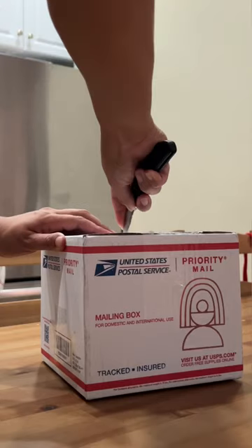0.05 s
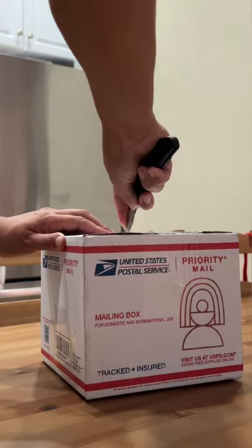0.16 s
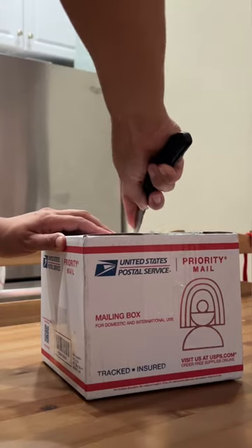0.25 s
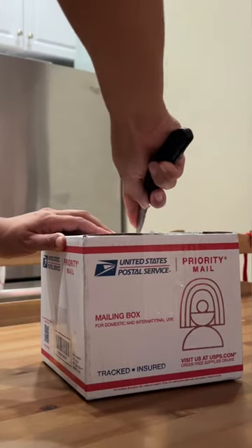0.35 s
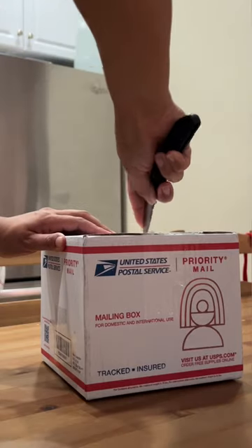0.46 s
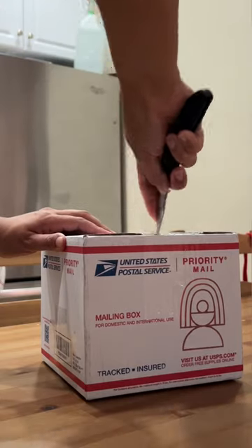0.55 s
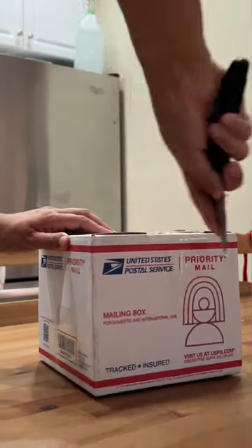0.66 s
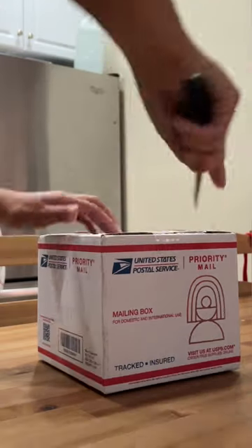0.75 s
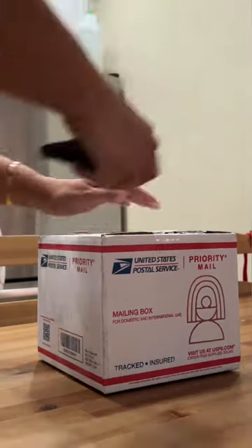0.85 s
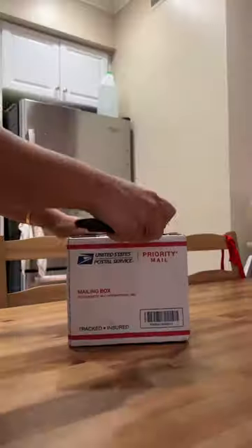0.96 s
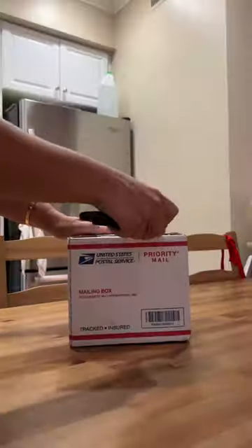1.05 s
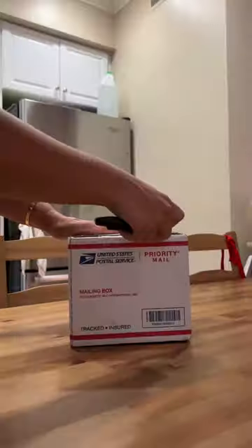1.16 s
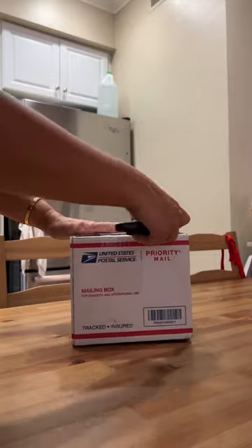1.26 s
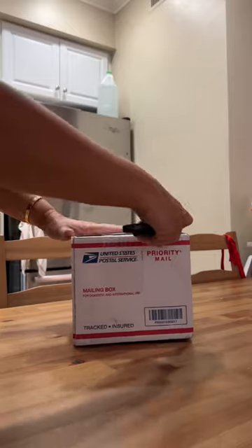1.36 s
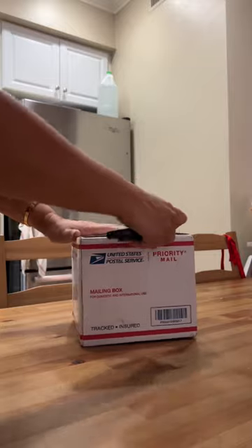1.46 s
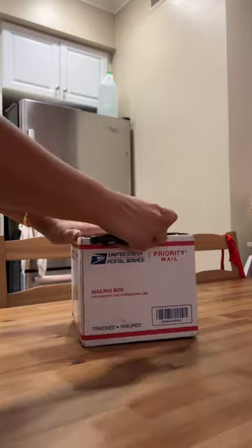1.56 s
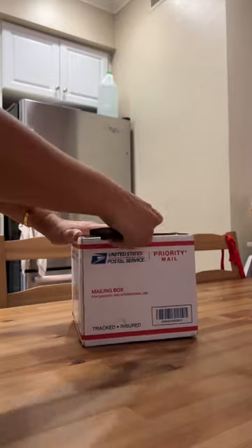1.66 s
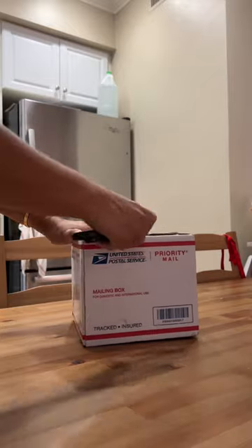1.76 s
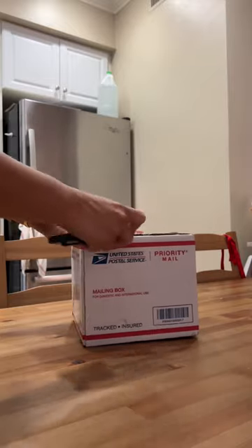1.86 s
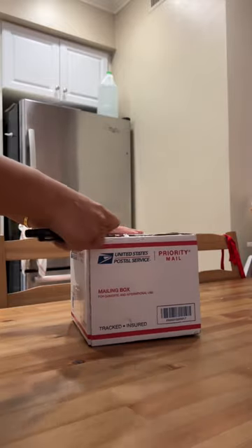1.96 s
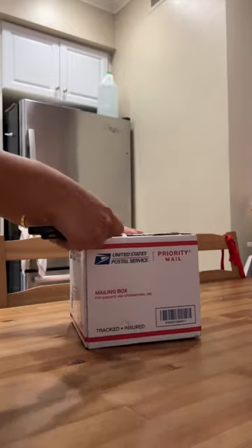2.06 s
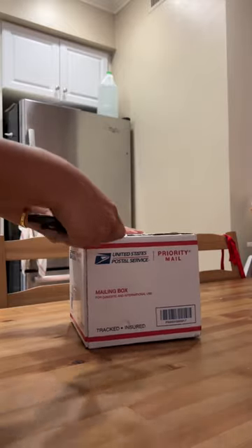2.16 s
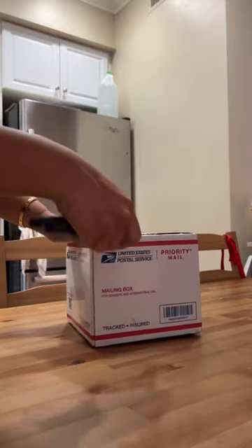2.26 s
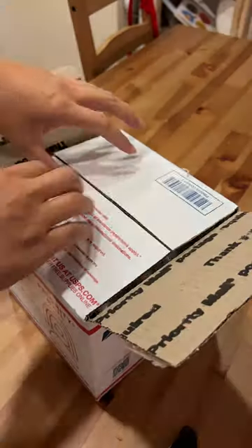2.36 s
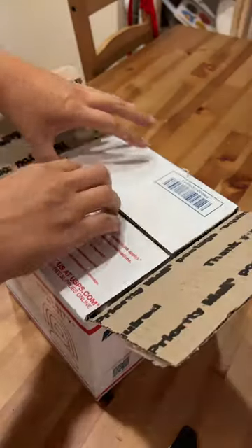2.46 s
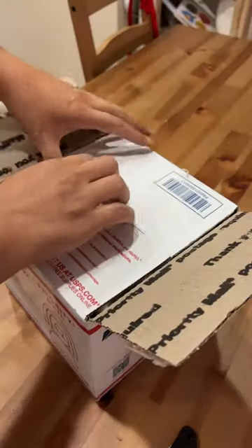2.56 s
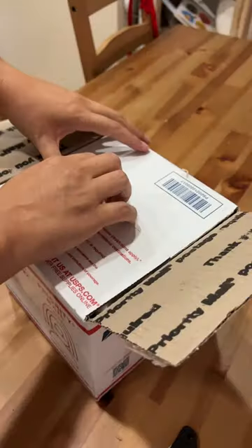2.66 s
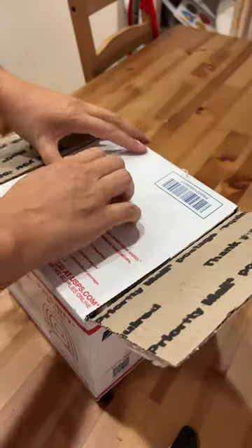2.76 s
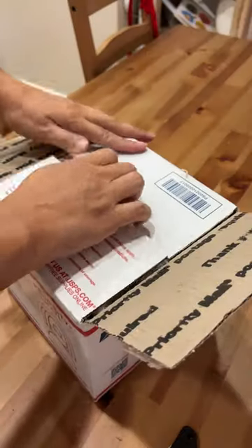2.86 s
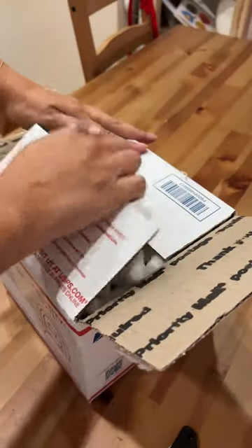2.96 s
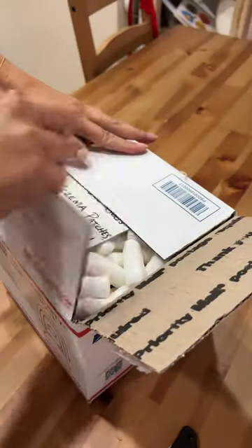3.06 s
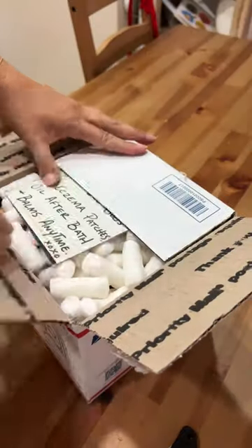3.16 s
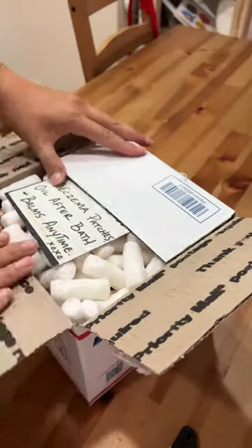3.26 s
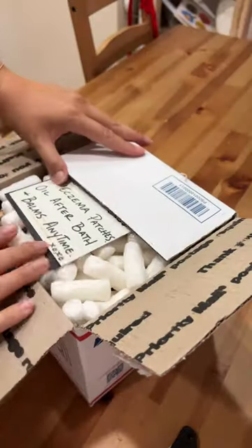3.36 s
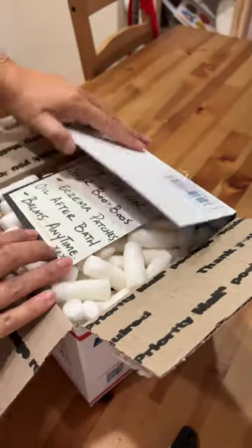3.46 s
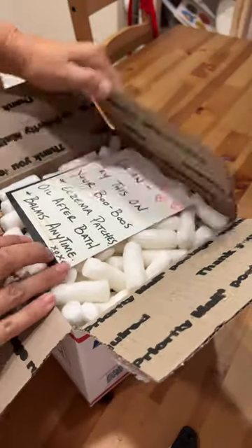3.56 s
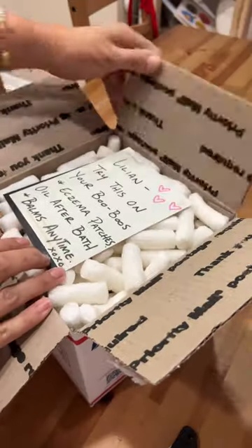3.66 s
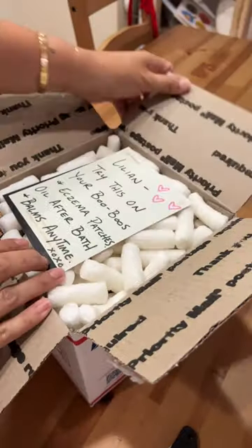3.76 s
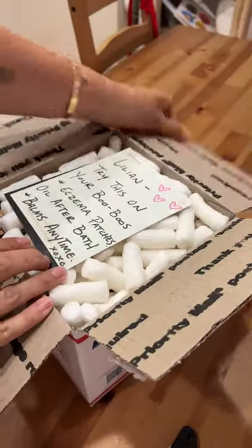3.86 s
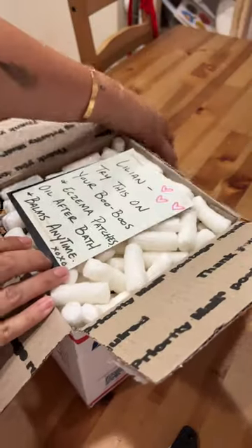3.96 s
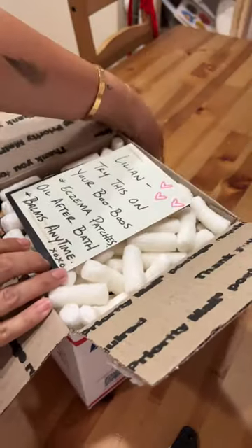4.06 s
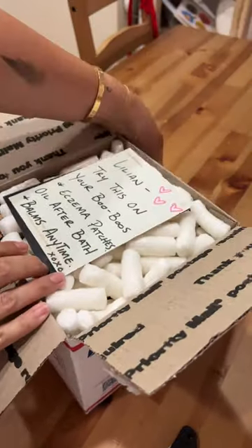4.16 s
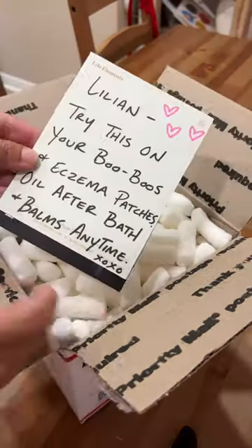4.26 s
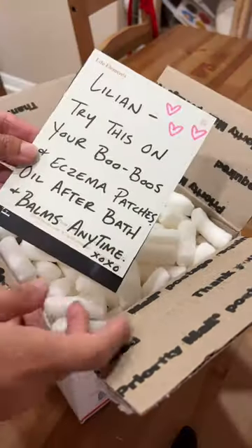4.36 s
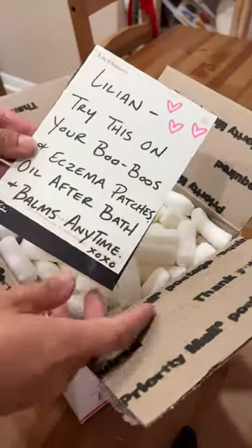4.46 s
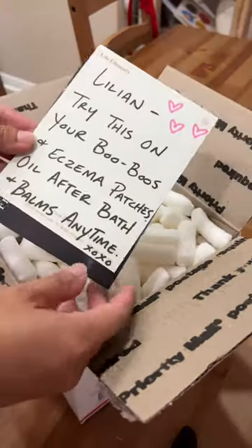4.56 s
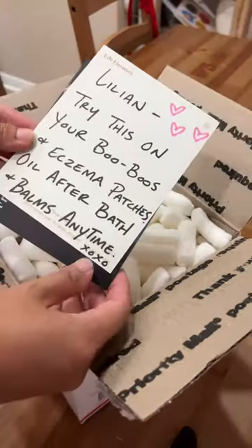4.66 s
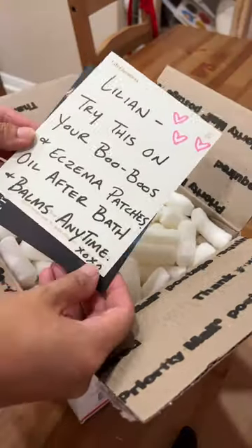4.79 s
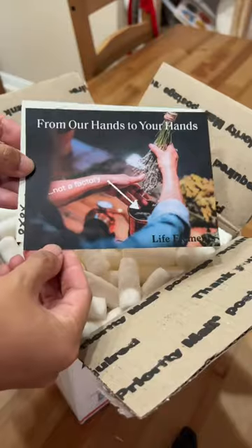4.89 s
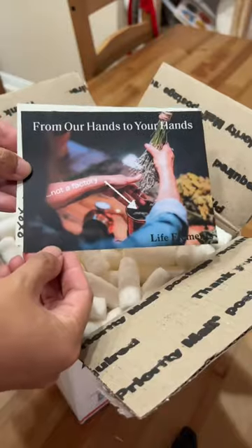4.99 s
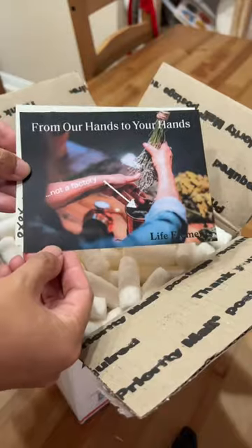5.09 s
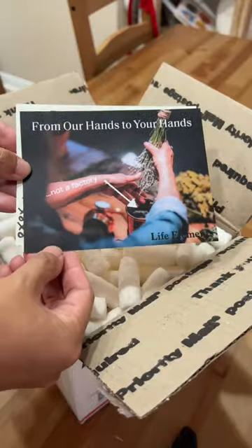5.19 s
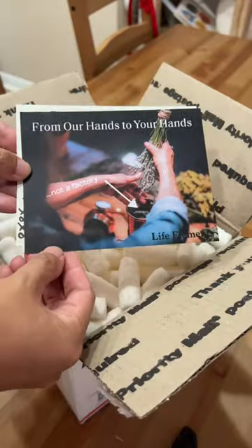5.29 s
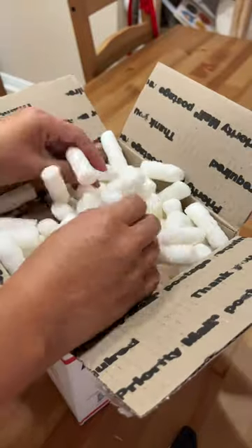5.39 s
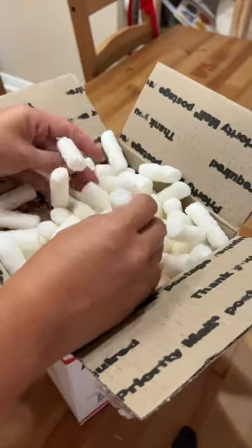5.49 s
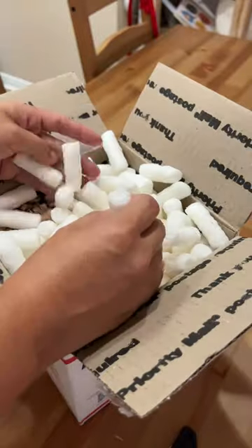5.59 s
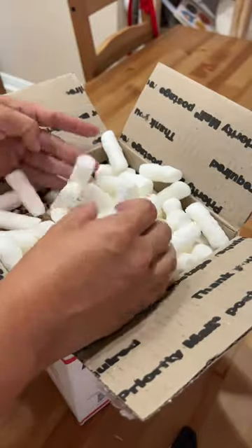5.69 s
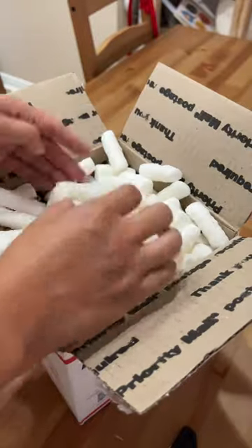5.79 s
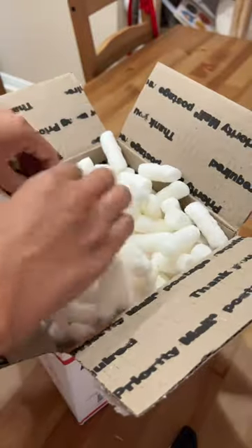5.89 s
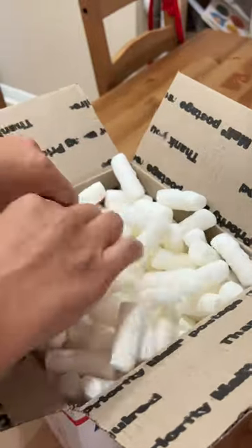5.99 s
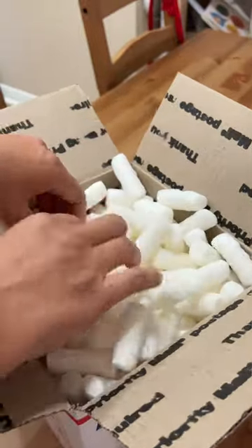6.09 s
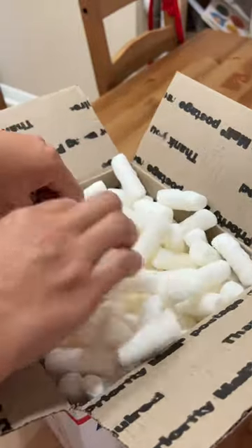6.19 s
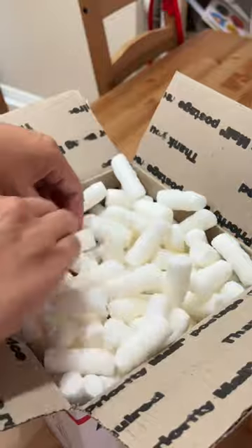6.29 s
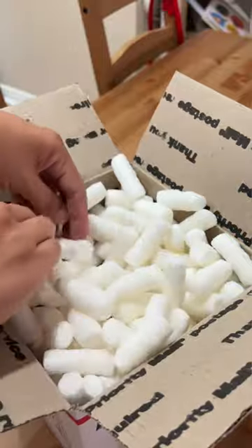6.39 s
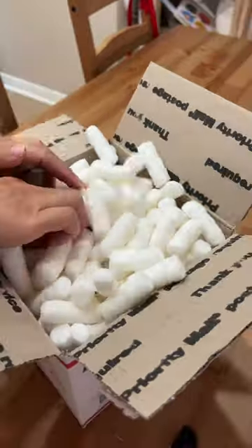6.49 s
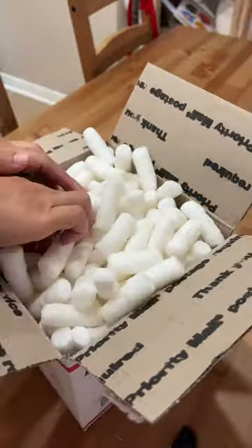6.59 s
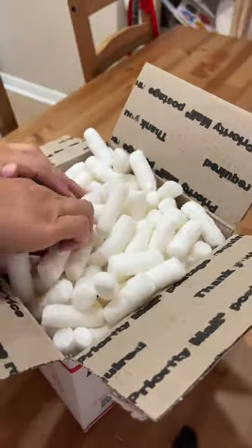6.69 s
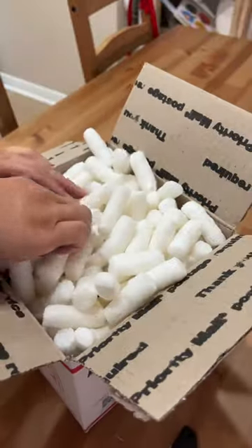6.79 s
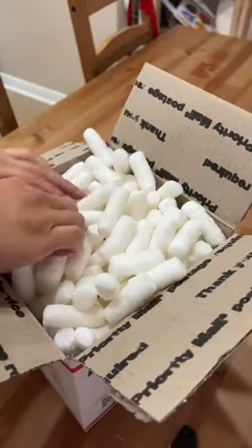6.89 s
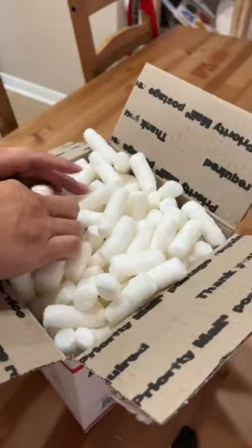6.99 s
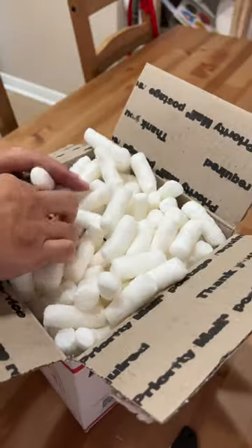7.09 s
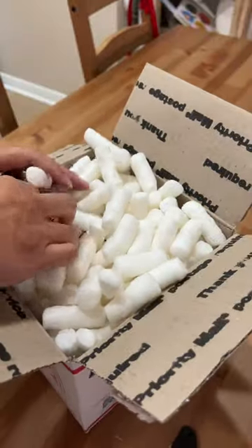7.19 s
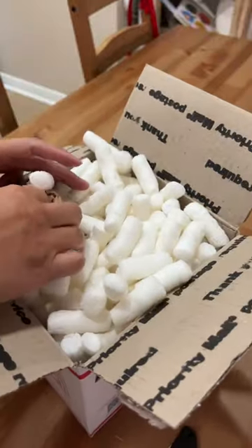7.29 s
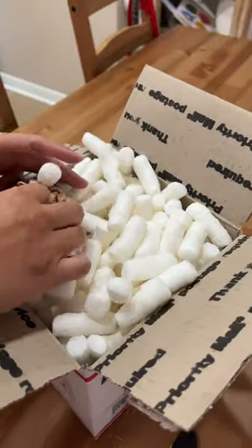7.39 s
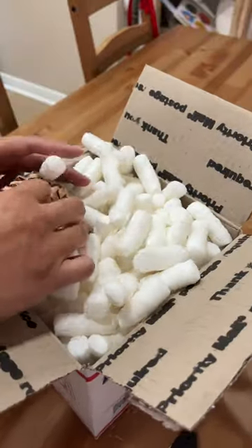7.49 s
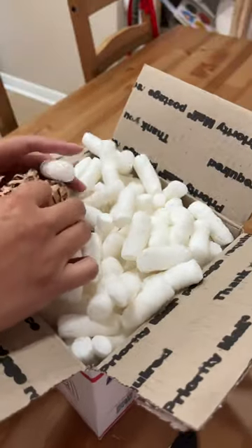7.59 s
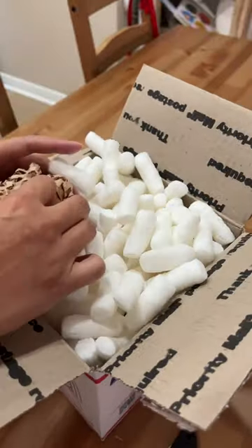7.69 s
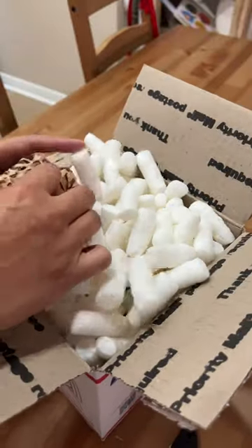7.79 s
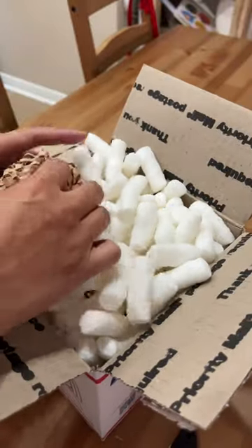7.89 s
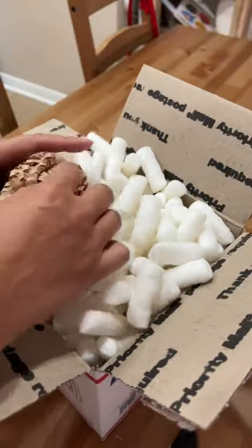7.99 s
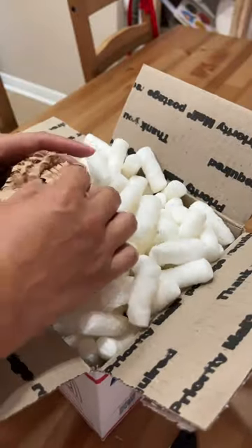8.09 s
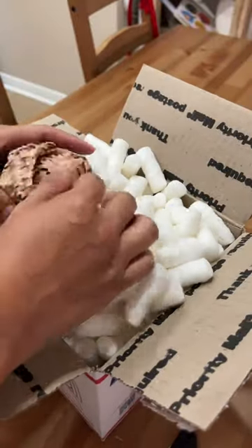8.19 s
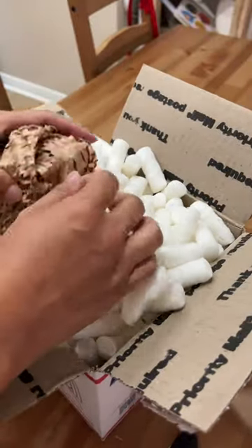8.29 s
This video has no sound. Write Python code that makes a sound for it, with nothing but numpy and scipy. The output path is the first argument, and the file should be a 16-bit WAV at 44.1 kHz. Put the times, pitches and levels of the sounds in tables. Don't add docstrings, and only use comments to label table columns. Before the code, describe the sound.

Hands slit a taped cardboard box with hollow scrapes and a sharp tape snap, fold the flaps, then dig noisily through foam packing peanuts.

```python
import sys
import numpy as np
from scipy import signal
from scipy.fft import rfft, irfft, next_fast_len
from scipy.io import wavfile
from scipy.ndimage import uniform_filter1d

SR = 44100
rng = np.random.default_rng(int(sys.argv[2]) if len(sys.argv) > 2 else 0)


def invert_db(level):
    return 10 ** (np.asarray(level, dtype=float) / 20)


def master_out(mix):
    frames = np.transpose(np.atleast_2d(mix))
    ceiling = np.clip(frames, -1, 1)
    pcm = np.round(ceiling * 32767).astype(np.int16)
    wavfile.write(sys.argv[1], SR, pcm)


N = 367794

# frequency_hz, density_db
FOAM_COLOUR = [(240, -26.5), (400, 7), (512, -9), (636, -2), (730, -13), (852, -7.5), (1010, -13.5),
               (2150, -4.5), (3160, -10), (6340, -14), (9920, -21.5), (11000, -18), (16000, -31)]
# frequency_hz, density_db
TAPE_COLOUR = [(240, -37), (400, -1), (645, -19.5), (719, -6.5), (865, -17.5), (1200, -13), (2050, -10.5),
               (3640, -18.5), (7990, -22), (9920, -25.5), (11200, -23), (16000, -42.5)]
# frequency_hz, density_db
ROOM_COLOUR = [(15, -62.5), (25, -31), (44, -5), (65, -3.5), (82, -17), (102, -3), (122, -0.5),
               (147, -12.5), (213, -12.5), (326, -21), (916, -41.5), (3000, -56.5), (8000, -56.5),
               (12500, -59), (14500, -71)]
# frequency_hz, width_hz, level_db
BOX_MODES = [(65, 14, -6.5), (111, 56, -2.5), (180, 127, 5.5), (213, 7, 11), (247, 2.9, -10),
             (311, 3, -7.5), (392, 22, -3), (407, 17, -15.5)]
# frequency_hz, width_hz, level_db
SHUT_MODES = [(381, 48, 6), (310, 30, 4), (415, 34, 1), (560, 45, -6.5)]
# frequency_hz, width_hz, level_db
CARD_MODES = [(850, 370, 5), (2610, 300, -5), (3930, 640, -6)]
# frequency_hz, width_hz, level_db
BLADE_MODES = [(1150, 600, 1), (2240, 190, 2)]
# frequency_hz, width_hz, level_db
SNAP_MODES = [(1290, 560, -10.5), (2300, 540, -10), (3130, 260, 1), (4470, 780, 11.5), (7550, 820, -9),
              (10100, 2400, -14.5)]
# frequency_hz, t60_s
KITCHEN_T60 = [(100, 0.2), (500, 0.15), (3000, 0.24), (12000, 0.51)]
# frequency_hz, side_minus_mid_db
STEREO_WIDTH = [(40, -16), (70, -23), (110, -32), (170, -38), (270, -24.5), (450, -10.5), (740, -5),
                (1220, -21), (2010, -9.5), (4000, -11), (8000, -2), (15000, 0)]
# frequency_hz, left_minus_right_db
STEREO_LEAN = [(180, 0), (260, 2.6), (330, 2.6), (520, 0)]

SHOTS = [
    0,
    .928,
    2.328,
    4.858,
    5.358,
    5.966,
    6.516,
    8.065,
    9,
]
# start_s, end_s
SHUT_SPANS = [
    (0, .93),
    (2.46, 2.66),
    (7.3, 7.85),
]
# peak_s, rub_db, box_over_rub_db, rise_20db_s, fall_20db_s
SLITTING_STROKES = [(0.021, -43, 16, .02, 0.02), (0.04, -52.5, 15.5, -0.1, 0.1), (0.0, -51, 21.5, 3, -0.34),
                    (0.12, -62.5, 11, .6, 1.6), (0.166, -49, 17, -0.06, 0.1), (0.189, -48, 17, -0.21, 0.09),
                    (0.225, -44, 14.5, -0.14, 0.16), (0.254, -48, 17.5, -0.1, 0.14),
                    (0.39, -59.5, 15.5, 1.9, -4), (0.412, -47, 11.5, 0.15, 0.14), (0.5, -40, 8, 0.04, 0.09),
                    (0.549, -40, 13, 0.04, 0.08), (0.455, -38.5, 10, .055, 0.2152),
                    (0.605, -41, 12, 0.17, 0.17), (0.68, -48, 11.5, -0.96, 0.17), (0.96, -63, 10.5, -1, 4),
                    (1.06, -63.5, 3, -2, -22), (1.202, -51.5, 8.5, 0.32, 0.16),
                    (1.26, -62, 10.5, -0.6, 0.6), (1.488, -55.5, 7.5, 0, 0.6), (1.598, -42, 15, .002, .12),
                    (1.638, -42, 10, .04, .24), (1.901, -46, 9.5, 0.21, 0.3),
                    (1.95, -45.5, 10, 0.16, -0.03), (2.16, -55, 6, .3, 0.25)]
# peak_s, rub_db, box_over_rub_db, rise_20db_s, fall_20db_s
FOLDING_STROKES = [(2.364, -69, 5, 0.3, .3), (2.391, -48, -9, 0.0027, 0.099), (2.42, -52.5, 2, 0.022, 0.11),
                   (2.461, -58.5, 21.5, 0.0054, 0.07), (2.489, -59.5, 11.5, .05, .1),
                   (2.515, -57.5, 12.5, 0.13, .2), (2.629, -55.5, 12.5, 0.089, 0.04),
                   (2.574, -50.5, 10.5, 0.14, 0.19), (2.784, -52.5, 11, 0.15, 0.21),
                   (2.912, -37, 2, 0.019, 0.04), (3.036, -54.5, 8, 0.38, 0.02),
                   (3.05, -43, 1.5, 0.0026, 0.039), (3.16, -55.5, 9, 0.63, .1),
                   (3.196, -38.5, -4, 0.057, 0.11), (3.35, -53.5, 11, 0.59, 0.53),
                   (3.583, -49, 7.5, 0.43, 0.2), (3.72, -44, -17, .005, 0.027),
                   (3.76, -59, 9.5, 0.13, 0.58), (3.92, -57.5, 10.5, 0.046, 0.35),
                   (4.09, -64, 16, 0.078, 0.74)]
# peak_s, rub_db, box_over_rub_db, rise_20db_s, fall_20db_s
LIFTING_STROKES = [
    (4.225, -56.5, 14.5, 0.018, 0.17),
    (4.255, -51, 9, 0.12, 0.096),
    (4.29, -54, 4, 0.13, 0.15),
    (4.42, -54, 8, 0.31, 0.35),
    (4.621, -69.5, 12.5, .2, 0.47),
    (4.968, -65.5, 7.5, 0.082, 0.15),
    (5.205, -73.5, 0, 0.045, 0.17),
]
# peak_s, rub_db, box_over_rub_db, rise_20db_s, fall_20db_s
DIGGING_STROKES = [(5.37, -53.5, 6, 0.025, 0.54), (5.44, -52.5, 5.5, .1, 0.23),
                   (5.595, -50.5, -5, 0.35, 0.098), (5.745, -56, 6.5, 0.63, 0.025),
                   (5.8, -60.5, 9, 0.27, 0.45), (5.861, -48.5, 6.5, 0.0087, 0.31), (5.957, -48, 3, .06, .1),
                   (6.01, -49.5, 5, 0.52, 0.68), (6.224, -46, 4.5, 0.077, 0.11),
                   (6.397, -45, -0.5, 0.088, 0.14), (6.49, -40.5, 0.5, 0.091, 0.86),
                   (6.534, -44, 14, 0.019, 0.074), (6.61, -41, -4.5, 0.42, 2.7),
                   (6.8136, -30, -3.5, 0.0036, 0.017), (6.788, -36.5, -11, 0.04, 0.08),
                   (6.87, -46, 4.5, 0.057, 0.38), (6.979, -37.5, -0.5, 0.04, 0.67),
                   (7.13, -35.5, -2.5, 1, 0.14), (7.24, -43.5, 0, .02, 0.34),
                   (7.32, -42.5, -1.5, 0.28, 0.4), (7.431, -39, -3, 0.42, 0.45),
                   (7.5, -41.5, 0, 0.26, 0.087), (7.585, -42.5, -2.5, 0.018, 0.84),
                   (7.66, -40, -2, 0.26, 0.27), (7.87, -42.5, 3.5, 0.17, 0.16), (7.759, -38, 0, 0.4, 0.26),
                   (8.026, -43.5, 4.5, 0.15, 0.061), (8.109, -40.5, -0.5, 0.062, 0.25),
                   (8.178, -43, -9, 0.39, 0.32), (8.33, -51, 10.5, 0.19, .3)]
# fizz_over_crackle_db, board_over_crackle_db
ACTION_BALANCE = [
    (2.5, 2),
    (-1.5, 1),
    (-2.5, -3),
    (-4, -3.5),
]
# time_s, toward_fizz_db
TOUCH_CURVE = [(0, -1), (.6, -4.5), (1.05, -14.5), (1.2, -4.5), (1.95, -4), (2.15, 2), (2.3, -8),
               (2.5, 1.5), (2.7, -3), (2.9, -4), (3.6, 2), (4.12, -5), (4.25, 0.5), (4.31, 10), (4.7, 1),
               (4.95, -16.5), (5.33, -7), (5.37, 7.5), (5.85, 3), (6.6, 0.5), (7.2, -3.5), (7.45, -3),
               (7.55, -5), (7.8, -2), (8.34, 1)]
# start_s, crack_db, thump_over_crack_db, board_over_crack_db, thump_hz
SLITTING_KNOCKS = [(0.0165, -32, 10, 5, 604), (0.036, -35, 9.5, -3, 415), (0.163, -38, 12, 8, 400),
                   (0.166, -39, 15.5, 0.5, 215), (0.188, -39.5, 15, 0, 365),
                   (0.2215, -31.5, 6.5, -1.5, 293), (0.252, -32.5, 10, 3, 398),
                   (0.3653, -32.5, -3, 0.5, 310), (0.4497, -32, -1, -7, 310), (0.5448, -34, -6, 12.5, 204),
                   (0.5746, -30, 6, -8, 128), (0.608, -16, -2.5, -3, 190), (1.1995, -42.5, 12.5, 8.5, 219),
                   (1.2, -46.5, 12, -9, 1230), (1.596, -26, -0.5, 0, 1070), (1.6005, -27, 3.5, -1, 1120),
                   (1.6146, -29.5, 5, -6.5, 213), (1.659, -42, 15, -5, 213), (1.675, -44.5, 16, -4, 213),
                   (1.642, -41.5, 13.5, 2, 213), (1.606, -41.5, 11.5, 7.5, 327),
                   (1.6522, -13, -19, -5.5, 300), (0.6, -36.5, 15, 2.5, 300)]
# start_s, crack_db, thump_over_crack_db, board_over_crack_db, thump_hz
FOLDING_KNOCKS = [(2.3867, -35.5, 0.5, 7.5, 122), (2.4628, -39, 12, -26, 400), (2.468, -37.5, 5, -1, 108),
                  (2.476, -47, 10, 2, 420), (2.484, -51.5, 12, -2, 200), (2.5328, -34, -5, -9, 171),
                  (2.5685, -37.5, 1.5, -9, 111), (2.6208, -49, 7, 6, 369), (2.9142, -31, 0, -16, 1150),
                  (2.917, -41.5, -3, -22, 222), (3.0506, -29, 1, -11, 220), (3.1883, -35, 5.5, -26, 218),
                  (3.196, -36.5, 9.5, -15, 750), (3.5501, -24.5, -13, -13.5, 230),
                  (3.5731, -29, -12, -7, 227), (3.7182, -31.5, 3, 3.5, 213), (3.918, -36.5, 4.5, 7, 228),
                  (4.0916, -51.5, 14, 15, 463)]
# start_s, crack_db, thump_over_crack_db, board_over_crack_db, thump_hz
DIGGING_KNOCKS = [(5.8613, -38, -13, -1, 207), (5.91, -37, -19, 2.5, 180), (5.9533, -33.5, -1, -4, 213),
                  (6.2222, -37, -7, 0, 237.7), (6.5302, -29, -1, -9, 123), (6.578, -22.5, -10.5, -8, 448),
                  (6.6022, -24, -9.5, -9, 156), (6.6813, -24.5, -5.5, -7, 415),
                  (6.8114, -22.5, -3, -6, 290), (6.8632, -23.5, -0.5, 2.5, 388),
                  (6.908, -39, 8, -16.5, 141), (7.2374, -31, -27.5, -9, 250), (7.5765, -41, -3, 8, 180),
                  (7.774, -33, -14, 10, 254), (8.023, -43, -2, 3, 170), (8.1131, -39, -20, -10, 261)]
# start_s, peak_db, pitch_hz
POP_EVENTS = [(0.228, -34, 1520), (0.3466, -43, 1630), (0.4085, -40, 1580), (0.5275, -30, 2080),
              (0.5786, -25, 2040), (0.5854, -15, 1610), (0.6659, -38, 2180), (0.7652, -39, 1710),
              (1.2885, -51, 1380), (1.5287, -35.5, 1300), (1.612, -16.5, 1350), (1.8537, -45, 1320),
              (1.8938, -30, 2220), (1.9514, -32, 1760), (5.7828, -53, 6140), (5.832, -39, 5090),
              (6.1305, -28, 8750), (6.3406, -43, 4390), (6.3863, -30, 1930), (6.464, -29, 5880),
              (6.6028, -34, 1990), (6.6593, -18, 4540), (6.6884, -23, 4400), (6.78, -29, 1760),
              (6.8928, -42, 1480), (6.9623, -28, 1670), (7.3967, -30, 2010), (7.626, -26, 1940),
              (7.7154, -23, 2580), (7.7754, -31, 1430), (7.855, -29, 1370), (7.939, -32, 2240),
              (8.0845, -27, 8880), (8.111, -29, 1670), (8.1558, -24, 1860), (8.2094, -31.5, 2340)]
# start_s, peak_db, fizz_over_peak_db
TICK_EVENTS = [(1.265, -60, -1), (1.3007, -54, -10), (1.3657, -61, -8), (1.4422, -38, 5.5),
               (1.511, -34, -1), (2.1826, -45, 3), (2.271, -42.5, -23), (2.859, -38, -13),
               (5.4273, -52, -0.5), (5.5325, -29.5, -24), (5.596, -33.5, 4), (6.2437, -49, -3),
               (7.817, -40, 3), (7.9856, -41, 10), (8.1332, -34, 13.5), (8.2794, -37.5, 13),
               (8.2957, -30.5, 2), (1.639, -21, 10.5)]

TIME_S = np.arange(N) / SR
CRACKLE_HZ, FIZZ_HZ, BOARD_HZ = (1500, 7000), (7000, 17000), (500, 1600)
DIGGING_FROM_S = SHOTS[4]


def evened(x):
    return x / np.sqrt(np.mean(x ** 2) + 1e-20)


def peaked(x):
    return x / abs(x).max()


def read(points, hz):
    f, value = np.transpose(points)
    return np.interp(np.log(hz + 1), np.log(f + 1), value)


def colour(x, points):
    n = next_fast_len(x.shape[-1])
    gain = invert_db(read(points, np.fft.rfftfreq(n, 1 / SR)))
    return irfft(rfft(x, n) * gain, n)[..., :x.shape[-1]]


def band(x, lo_hz, hi_hz, order=3):
    sos = signal.butter(order, [lo_hz, min(hi_hz, .45 * SR)], "band", fs=SR, output="sos")
    return signal.sosfilt(sos, x)


def wander(ms):
    size = max(round(ms * SR / 1000), 1)
    return evened(uniform_filter1d(uniform_filter1d(rng.standard_normal(N), size), size))


def during(start_s, end_s):
    return (TIME_S > start_s) & (TIME_S < end_s)


def ring(x, modes):
    out = np.zeros(len(x))
    for hz, width_hz, db in modes:
        pole = np.exp((2j * np.pi * hz - np.pi * width_hz) / SR)
        out += invert_db(db) * signal.lfilter([1 - abs(pole)], [1, -pole], x).real
    return out


def bend(x):
    delay_cycles = 2.2
    n = next_fast_len(len(x) + 4000)
    hz = np.fft.rfftfreq(n, 1 / SR)
    return irfft(rfft(x, n) * np.exp(-2j * np.pi * delay_cycles * np.log(hz + 40)), n)[:len(x)]


def shifting(x, depth_db, frames, bins, size):
    z = signal.stft(x, nperseg=size)[2]
    patches = rng.standard_normal(z.shape)
    for _ in range(2):
        patches = uniform_filter1d(uniform_filter1d(patches, bins, 0), frames, 1)
    return signal.istft(z * invert_db(depth_db * evened(patches)), nperseg=size)[1][:N]


def placed(events):
    out = np.zeros(N + 4000)
    for s, sound in events:
        out[round(s * SR):][:len(sound)] += sound
    return out[:N]


def bursts(count, size, decay_60db_s):
    return rng.standard_normal((count, size)) * invert_db(-60 * np.arange(size) / SR / decay_60db_s)


def room_tone():
    return invert_db(-54.5) * evened(colour(rng.standard_normal(N), ROOM_COLOUR))


def strokes():
    middling_db, fizz_growth, board_growth = -50, 1.16, 1.226
    t = np.arange(0, N / SR + .002, .001)
    shot = np.searchsorted(SHOTS, t, "right")
    level_db = np.full((4, len(t)), -120.)
    actions = [SLITTING_STROKES, FOLDING_STROKES, LIFTING_STROKES, DIGGING_STROKES]
    for rows, (fizz_db, board_db) in zip(actions, ACTION_BALANCE):
        for s, rub_db, weight_db, rise_s, fall_s in rows:
            under_db = 20 * np.where(t < s, (s - t) / max(rise_s, .002), (t - s) / max(fall_s, .002))
            now_db = rub_db - under_db
            over_db = now_db - middling_db
            layers = [now_db,
                      middling_db + fizz_db + fizz_growth * over_db,
                      middling_db + board_db + board_growth * over_db,
                      now_db + weight_db]
            same_shot = shot == np.searchsorted(SHOTS, s, "right")
            level_db = np.where(same_shot, np.maximum(level_db, layers), level_db)
    touch_db = np.interp(t, *np.transpose(TOUCH_CURVE))
    level_db[1:3] += [touch_db, -0.7 * touch_db]
    return [np.interp(TIME_S, t, db) for db in level_db]


def grains(per_s, spread_db, clump_db, bed_db):
    size = invert_db(spread_db * np.minimum(rng.exponential(1, N), 3.4)) * (rng.random(N) < per_s / SR)
    slips = evened(size * rng.choice([-1, 1], N)) + invert_db(bed_db) * rng.standard_normal(N)
    return evened(slips * invert_db(clump_db * wander(ms=3.5) + 0.34 * clump_db * wander(ms=96.0)))


def rummage():
    slips = grains(per_s=4000, spread_db=3.8, clump_db=1.9, bed_db=1)
    tape = card_flutter(blade_slide(colour(slips, TAPE_COLOUR)))
    foam = colour(slips, FOAM_COLOUR)
    layers = []
    for hz in (CRACKLE_HZ, FIZZ_HZ, BOARD_HZ):
        rub = np.where(TIME_S >= DIGGING_FROM_S, evened(band(foam, *hz)), evened(band(tape, *hz)))
        layers.append(shifting(rub, depth_db=1.9, frames=10, bins=2, size=256))
    layers.append(box_hum(slips))
    return bend(sum(invert_db(db) * evened(layer) for db, layer in zip(strokes(), layers)))


def box_hum(slips):
    pushes = slips + 2.73 * grains(per_s=300, spread_db=3.5, clump_db=3.0, bed_db=2.0)
    shut = sum(during(*span) for span in SHUT_SPANS)
    hum = np.where(shut, ring(pushes, BOX_MODES + SHUT_MODES), ring(pushes, BOX_MODES))
    return shifting(hum, depth_db=2.5, frames=4, bins=2, size=2048)


def knock(db, thump_db, board_db, thump_hz, noise):
    t = np.arange(len(noise)) / SR
    burst = noise * np.minimum(t / 0.0029, 1) * invert_db(-60 * t / 0.0065)
    fizz_db = -8.5 - 0.59 * board_db
    crack = peaked(band(burst, 1500, 7000, order=2))
    crack = crack + invert_db(fizz_db) * peaked(band(burst, 7000, 15500, order=2))
    blow = np.exp(-((t - .0005) / 0.00021) ** 2)
    board = peaked(band(blow, 660, 4200, order=1)) + .5 * peaked(band(burst, 680, 2500, order=2))
    thump = band(blow, 0.88 * thump_hz, 1.11 * thump_hz, order=1)
    thump = peaked(bend(thump)) + 0.15 * peaked(bend(ring(thump, BOX_MODES)))
    return invert_db(db) * (bend(crack) + invert_db(board_db) * peaked(bend(board)) + invert_db(thump_db) * thump)


def knocks():
    rows = SLITTING_KNOCKS + FOLDING_KNOCKS + DIGGING_KNOCKS
    return placed((s, knock(*row, rng.standard_normal(4000))) for s, *row in rows)


def kitchen(x):
    taps = np.zeros(SR // 2)
    at = np.arange(300, SR // 2 - 20, 20)
    at = at + rng.integers(0, 20, len(at))
    taps[at] = rng.choice([-1., 1.], len(at))
    hz, t, z = signal.stft(taps, SR, nperseg=256)
    tail = signal.istft(z * invert_db(-60 * t / read(KITCHEN_T60, hz)[:, None]), SR, nperseg=256)[1]
    return signal.fftconvolve(x, tail / np.linalg.norm(tail))[:N]


def pops():
    events, spread = [], 1.22
    for (s, db, hz), burst in zip(POP_EVENTS, bursts(len(POP_EVENTS), 400, 0.0065)):
        pop = band(burst, hz / spread, hz * spread, order=1)
        events.append((s, invert_db(db - 4) * peaked(pop)))
    return placed(events)


def joins():
    fade_s, depth = 0.013, 0.76
    return 1 - depth * sum((TIME_S > s) * np.exp(-((TIME_S - s) / fade_s) ** 2) for s in SHOTS[1:-1])


def blade_slide(tape):
    once = ring(tape, BLADE_MODES)
    gathering = np.clip((TIME_S - 1.0) / 0.29, .08, 1)
    slide = gathering * tape + 0.6 * once + 1.4 * ring(once, BLADE_MODES)
    return np.where(during(.93, 1.2), slide, tape)


def ticks():
    events = []
    for (s, db, fizz_db), burst in zip(TICK_EVENTS, bursts(len(TICK_EVENTS), 400, 0.0049)):
        low = peaked(band(burst, 1500, 4500, order=2))
        fizz = peaked(band(burst, 4500, 15500, order=2))
        events.append((s, invert_db(db) * (low + invert_db(fizz_db) * fizz)))
    return placed(events)


def snap():
    at = np.arange(2000)
    slips = np.exp(-at / 2.4) + .5 * (at == 40)
    return placed([(1.6532, invert_db(-3) * peaked(ring(slips, SNAP_MODES)))])


def card_flutter(tape):
    flutter = 1.3 * tape + 24 * ring(ring(tape, CARD_MODES), CARD_MODES)
    return np.where(during(4.205, 4.3), flutter, tape)


def scene():
    hands = rummage() + knocks() + pops() + ticks() + snap()
    close = band(hands, 55, 19000)
    mix = joins() * (close + invert_db(-17) * kitchen(close) + room_tone())
    return np.array([mix, mix])


def ports(mid):
    t = np.arange(160) / SR
    turn = np.pi * (TIME_S * 23 + .5 * wander(ms=42))
    side = -.75 * signal.hilbert(mid, next_fast_len(N))[:N].imag
    for k in range(3):
        path = rng.standard_normal(160) * np.exp(-t / .0008)
        path = irfft(np.exp(1j * np.angle(rfft(path, 512))))
        moving = 0.8 * mid * np.sqrt(2 / 3) * np.cos(turn + k * np.pi / 3)
        side += signal.oaconvolve(moving, path)[:N]
    side = colour(side, STEREO_WIDTH) * invert_db(0.5)
    left_lean, right_lean = [[(hz, sign * db / 2) for hz, db in STEREO_LEAN] for sign in (1, -1)]
    return np.array([colour(mid + side, left_lean), colour(mid - side, right_lean)])


def low_pass(x):
    return signal.sosfilt(signal.butter(12, 16820, fs=SR, output="sos"), x)


def record(dry):
    heard = ports(band(dry.mean(0), 49, 19000, order=2))
    mix = colour(heard, [(15850, 0), (16050, -40)])
    return low_pass(mix)


dry = scene()
out = record(dry)
master_out(out)
```